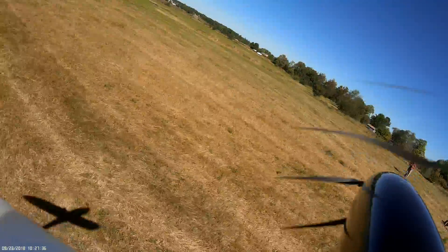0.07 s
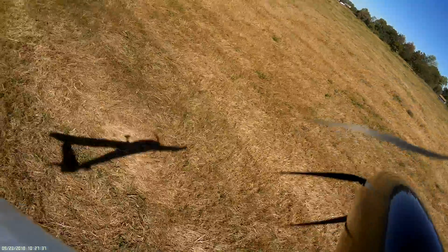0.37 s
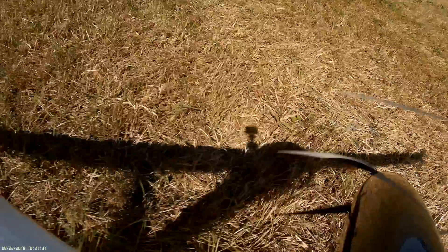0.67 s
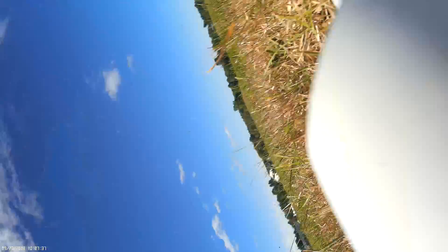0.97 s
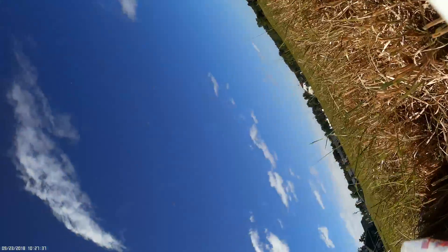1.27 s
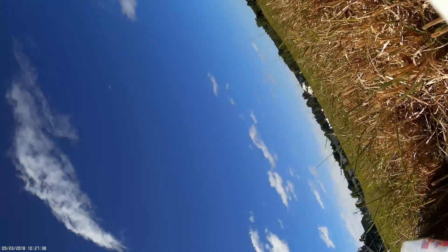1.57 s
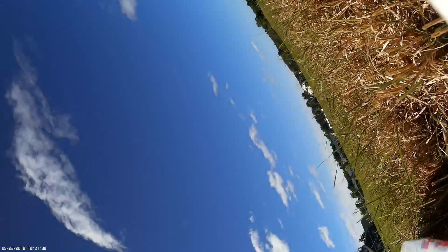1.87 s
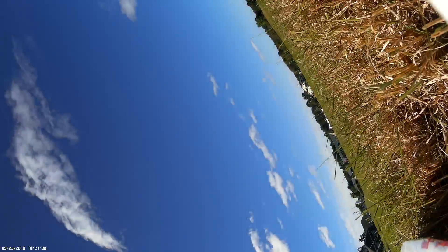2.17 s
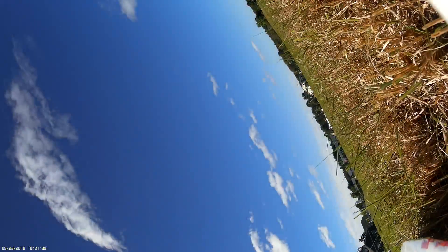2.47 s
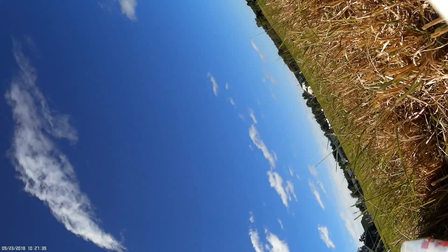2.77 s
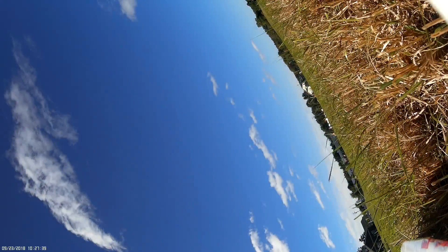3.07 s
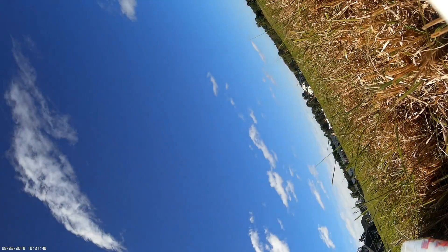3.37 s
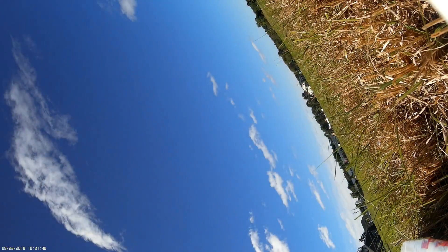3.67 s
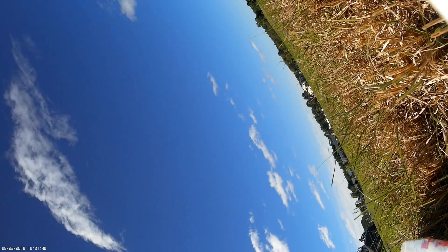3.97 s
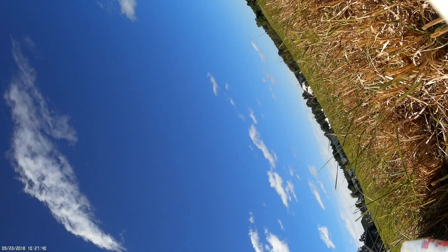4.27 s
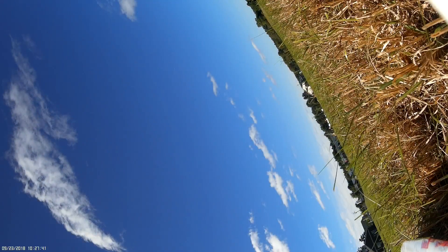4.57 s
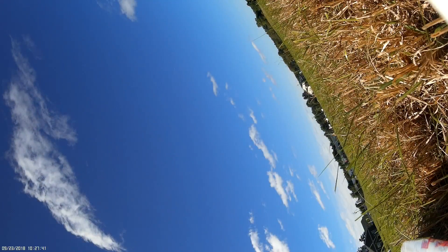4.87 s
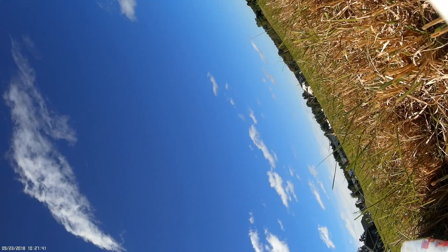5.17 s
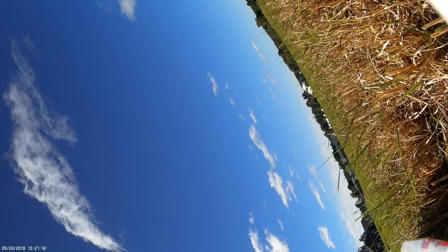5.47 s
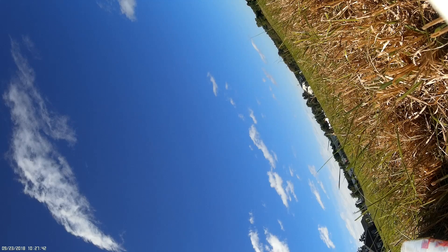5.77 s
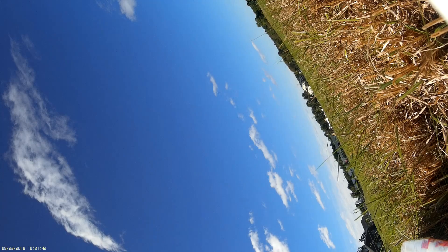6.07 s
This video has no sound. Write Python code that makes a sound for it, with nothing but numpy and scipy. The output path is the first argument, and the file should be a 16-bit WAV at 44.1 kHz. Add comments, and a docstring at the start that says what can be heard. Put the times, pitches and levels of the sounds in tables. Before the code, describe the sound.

The microphone rides on a model glider diving toward a dry grass field. From the start, air rushes past and the windmilling propeller makes a fast, low throb, strongest from 0.2 to 0.5 seconds and slowing slightly. A faint, thin whistle comes just before touchdown.

At about 0.75 seconds the hull hits and ploughs through crackling stalks, with loud cracks that overload the microphone around 0.8 seconds. The glider tumbles with thumps, scrapes and bits of gear whirr, gives a last sharp knock near 1.2 seconds and settles.

A stalled servo buzzes softly from 1.3 to 1.7 seconds, then breaks into a louder, rattling whirr from 1.85 to 2 seconds. Small, scattered servo ticks follow until about 4.2 seconds. Quiet, low gusts on the microphone, a slight hiss and a very faint, high bush cricket continue to the end at about 6 seconds.

```python
"""A dry grass field, heard from on board a model glider that dives, propeller windmilling, and crashes.
Blade wakes throb in the rushing air; then the hull ploughs through the stalks, overloading the
microphone, cartwheels and knocks to rest on its side. A loaded servo buzzes, whirrs once and
goes on twitching; a breeze and a faint bush cricket remain."""
import sys
import numpy as np
from scipy import signal
from scipy.fft import rfft, irfft
from scipy.io import wavfile

SR = 44100
rng = np.random.default_rng(int(sys.argv[2]) if len(sys.argv) > 2 else 0)


def generate_wav(signal):
    """Clip the signal to [-1, 1] and save it as 16-bit WAV at the path in sys.argv[1]."""
    frames = np.transpose(np.atleast_2d(signal))
    scaled = np.clip(frames, -1, 1) * 32767
    pcm = np.round(scaled).astype(np.int16)
    wavfile.write(sys.argv[1], SR, pcm)


N = 269892
TIME = np.arange(N) / SR
# airframe resonances: (frequency [Hz], width [Hz], level [dB])
AIRFRAME = [(340, 70, -5), (600, 130, -2.5), (814, 130, -3), (1087, 79, 0.5), (1436, 180, -1),
            (1800, 140, 0.5), (2015, 160, -1), (2597, 400, -1.5), (3232, 210, -2), (4220, 530, -5.5),
            (5860, 1600, -15.5), (7300, 1200, -5.5), (10000, 900, -7), (12000, 1600, -9)]
# rumble of swirling air and of the hull on soil: (frequency [Hz], level [dB])
RUMBLE = [(20, -9.5), (60, 0.5), (130, 0.5), (250, -2), (500, -3), (1000, -10.5), (2000, -21.5),
          (4000, -39), (12000, -53.5)]


def from_db(db):
    """Decibels to gain."""
    return 10 ** (np.asarray(db) / 20)


def rms_one(x):
    """Scale to unit power."""
    return x / np.sqrt(np.mean(x ** 2) + 1e-20)


def butter(x, order, hz, kind="low"):
    """Butterworth filter, low-pass by default."""
    return signal.sosfilt(signal.butter(order, hz, kind, fs=SR, output="sos"), x)


def colour(x, spectrum):
    """Shape x with an EQ curve of (frequency [Hz], level [dB]) points; unit power."""
    hz, db = np.transpose(spectrum)
    bins = np.maximum(np.fft.rfftfreq(N, 1 / SR), 1)
    gain = from_db(np.interp(np.log(bins), np.log(hz), db)) * (bins > 10)
    return rms_one(irfft(rfft(x) * gain, N))


def noise(spectrum):
    """Smooth noise with a given spectrum."""
    return colour(rng.standard_normal(N), spectrum)


def drift(rate_hz):
    """Random wander, rolling off above rate_hz; unit power."""
    bins = np.fft.rfftfreq(N, 1 / SR)
    return rms_one(irfft(rfft(rng.standard_normal(N)) * np.exp(-(bins / rate_hz) ** 2), N))


def grains(per_s, spread_db):
    """Random clicks of very uneven size."""
    sizes = from_db(spread_db * np.minimum(rng.exponential(1, N), 4)) * rng.choice([-1, 1], N)
    return sizes * (rng.random(N) < per_s / SR)


def envelope(from_s, to_s, rise, fall, sag=0):
    """Rise to gain 1 at from_s, sag until to_s, then fall; slopes in dB/s."""
    before, after = np.maximum(from_s - TIME, 0), np.maximum(TIME - to_s, 0)
    held = np.maximum(np.minimum(TIME, to_s) - from_s, 0)
    return from_db(-np.minimum(rise * before + sag * held + fall * after, 200))


def add(track, s, sound):
    """Mix a short sound into the track at time s."""
    start = int(s * SR)
    track[start:start + len(sound)] += sound[:N - start]


def strike(modes, crush_s, bright_hz, click, rise_s=.0001, direct=.088):
    """A clean click plus a short gritty force rings a set of resonances; peak 1."""
    t = TIME[:SR // 10]
    force = rng.standard_normal(len(t)) * np.exp(-t / crush_s) * (1 - np.exp(-t / rise_s))
    force[int(rise_s * SR)] += click * np.linalg.norm(force)
    force = butter(force, 1, bright_hz)
    out = direct * force
    for k, (hz, width, db) in enumerate(modes):
        r = np.exp(-np.pi * width / SR)
        gain = (-1) ** k * from_db(db) * (1 - r * r) / 2
        out += signal.lfilter([gain, 0, -gain], [1, -2 * r * np.cos(2 * np.pi * hz / SR), r * r], force)
    return out / np.abs(out).max()


def air_rush(turns, chop=.23, fade_db_per_s=27, settle_s=.025):
    """The blades chop an airstream that fades as speed is lost and buffets the nose in spells."""
    # smooth and ragged airflow: (frequency [Hz], level [dB])
    smooth = [(200, -8.5), (1000, -0.5), (2000, 4.5), (3000, -5.5), (4300, -9), (5500, -16.5),
              (6800, -14.5), (7600, -4.5), (8400, -15.5), (9400, -8.5), (10400, -15.5), (11800, -8.5),
              (13400, -19), (15000, -18.5), (16000, -25.5)]
    ragged = [(15, -44), (25, -12.5), (70, -3.5), (97, -10), (130, 0), (166, -12), (200, 0), (439, -12),
              (734, -9), (1070, -16.5), (1330, -11.5), (11900, -43), (16000, -51)]
    # spells of turbulence: (start [s], end [s], level [dB])
    buffets = [(.015, 0.121, -10.5), (0.597, 0.718, -21.5)]
    rush = from_db(-25.5 - fade_db_per_s * TIME) * noise(smooth)
    spells = [from_db(db) / (1 + np.abs(TIME - np.clip(TIME, start, end)) / settle_s)
              for start, end, db in buffets]
    chopped = 1 + chop * np.cos(4 * np.pi * turns)
    return chopped * (rush + np.max(spells, axis=0) * noise(ragged))


def blade_wakes(turns, flying, touchdown_s, wake_s=.00075, jitter_s=.00046):
    """Two unequal blades sweep their wakes over the microphone, squarely in mid-dive."""
    uneven_db, second_blade_db = 1.9, -5.5
    passes = np.flatnonzero(np.diff(np.floor(2 * turns)) * flying[1:])
    t = np.arange(-SR // 100, SR // 100) / SR
    wakes = np.zeros(N)
    for k, at in enumerate(passes):
        size, late, wide = rng.standard_normal(3)
        u = (t - jitter_s * late) / (wake_s * np.exp(.13 * wide))
        gain = from_db(uneven_db * size + second_blade_db * (k % 2))
        add(wakes, at / SR, -u * np.exp(-np.abs(u)) * gain)  # a push, then a suction
    pressure_tail = butter(wakes, 1, 170)
    nose_boom = butter(wakes, 1, [200, 450], "band")
    wakes += pressure_tail / 2 + .93 * nose_boom
    wakes /= np.std(wakes[TIME < touchdown_s])
    swirl = from_db(-11) * noise(RUMBLE)
    return from_db(-8.5) * envelope(.155, .47, rise=208, fall=56, sag=5.5) * (wakes + swirl)


def dive(touchdown_s=.76, stopped_s=.8):
    """The windmilling propeller slows as the glider flattens out; touchdown ends wakes and rush."""
    # propeller speed: (time [s], rate [turns/s])
    speed = [(0, 69), (0.12, 65.5), (0.22, 64.5), (0.48, 64), (0.64, 59.5), (0.76, 57)]
    turns = np.cumsum(np.interp(TIME, *np.transpose(speed))) / SR
    flying = np.interp(TIME, [touchdown_s, stopped_s], [1, 0])
    return flying * (blade_wakes(turns, flying, touchdown_s) + air_rush(turns))


def servo_gears(first_kick_s, kick_hz, surge=.4):
    """Gear teeth whirr: smooth and dull in the pull-up, surging at the kick rate on the ground."""
    # meshing teeth: (frequency [Hz], level [dB])
    whirr = [(200, -29.5), (340, -14), (450, -17.5), (850, -5), (1400, -10), (2000, 4.5), (2650, -5),
             (3350, -1.5), (5100, -15.5), (5800, -11), (6800, -21), (7500, -16.5), (8300, -19), (9300, -20),
             (10700, -22), (11900, -19.5), (15500, -44)]
    # runs on the ground: (start [s], end [s], level [dB], sag [dB/s], release [dB/s])
    runs = [(0.863, 1.095, -35, -14, 400), (1.221, 1.235, -39, 10, 176), (1.748, 1.776, -60.5, 12, 300),
            (1.853, 2.026, -25, 86, 797)]
    teeth = colour(grains(per_s=4100, spread_db=4.5), whirr)
    pull_up = from_db(-29.5) * envelope(.55, .58, rise=550, fall=550) * butter(teeth, 1, 4500)
    running = sum(from_db(db) * envelope(start, end, rise=349.5, fall=fall, sag=sag)
                  for start, end, db, sag, fall in runs)
    torque = 1 + surge * np.cos(2 * np.pi * kick_hz * (TIME - first_kick_s))
    return pull_up + running * torque * teeth


def whistle(hz=9216, wander_hz=40, at_s=.74, half_length_s=.036):
    """A thin whistle swells and fades just before touchdown."""
    phase = 2 * np.pi * np.cumsum(hz + wander_hz * drift(80)) / SR
    return from_db(-45) * np.exp(-((TIME - at_s) / half_length_s) ** 2) * np.sin(phase)


def stubble():
    """Dry stalks snap in a dense crackle while the hull rumbles over the soil."""
    # snapping straw: (frequency [Hz], level [dB])
    straw = [(200, -5.5), (800, 2.5), (2000, 5), (3300, -1), (5200, -8), (7500, -4.5), (8400, -8),
             (9500, -6), (10600, -12.5), (12000, -4.5), (14800, -12.5), (16500, -26.5)]
    # stalk brushes and hull drags: (start [s], end [s], level [dB], release [dB/s])
    brushes = [(0.781, 0.835, -9, 950), (0.939, 0.974, -21, 220), (1.108, 1.121, -26, 699.5),
               (1.13, 1.2, -33.5, 169)]
    drags = [(0.721, .77, -14, 200), (0.782, 0.812, -7, 380), (0.9, 1.065, -27.5, 301),
             (1.188, 1.21, -40, 167)]
    crackle = colour(grains(per_s=8200, spread_db=2), straw) * from_db(1.6 * drift(83))
    brushing = [from_db(db) * envelope(start, end, rise=1000, fall=fall)
                for start, end, db, fall in brushes]
    dragging = [from_db(db) * envelope(start, end, rise=700, fall=fall)
                for start, end, db, fall in drags]
    return np.max(brushing, axis=0) * crackle + np.max(dragging, axis=0) * noise(RUMBLE)


def blows(snap_s=.0015, detune=.06):
    """Each blow cracks in the shell and sets the wing and fuselage bending with a thump."""
    # impacts: (time [s], level [dB], crush time [s], brightness [Hz], thump send [dB])
    impacts = [(.7618, -9.5, 0.0024, 3000, -12), (0.7749, -5.5, 0.0013, 9000, -4),
               (0.7933, 8, 0.003, 7100, -35), (0.8014, 10, 0.0023, 7000, -39),
               (0.8209, 7, 0.008, 9000, -16), (0.8276, 17, 0.003, 6040, -23),
               (.837, 5.5, 0.0085, 3030, -12.5), (.848, 3, 0.0064, 4000, -37),
               (0.886, -13.5, .005, 2460, -23.5), (0.9, -20, .0034, 3980, -22),
               (.9655, -8.5, 0.0071, 1500, 4.5), (1.0052, -6.5, 0.0021, 2750, -17),
               (1.0587, 0.5, 0.0011, 2800, -25), (1.1727, 6.5, 0.0013, 8000, -13),
               (1.1764, -6, 0.0033, 1300, -7), (1.1878, -11.5, 0.0028, 3990, -12.5),
               (1.2218, -25, 0.0068, 2004, -21), (1.2593, -24.5, 0.014, 1190, -29),
               (1.657, -47, .008, 500, -15.5)]
    # bending modes: (frequency [Hz], level [dB], time to fall 60 dB [s])
    bending = [(108, 0.5, 0.049), (198, 0.5, .04), (304, -6.5, .035), (478.8, -4, .035)]
    out, t = np.zeros(N), TIME[:SR // 5]
    for s, level_db, crush_s, bright_hz, thump_db in impacts:
        thump = np.zeros(len(t))
        for k, (hz, db, t60) in enumerate(bending):
            pitch = hz * (1 + detune * rng.standard_normal())
            thump += (-1) ** k * from_db(db - 60 * t / t60) * np.sin(2 * np.pi * pitch * t)
        click = 1.92 * np.exp(-crush_s / snap_s)  # brief blows snap, long ones crunch
        add(out, s, from_db(level_db) * strike(AIRFRAME, crush_s, bright_hz, click))
        add(out, s, from_db(level_db + thump_db) * thump / 2)
    return out


def servo_motor(first_kick_s, kick_hz, give_up_s=1.69, free_s=1.77, last_kick_s=2.03):
    """Control pulses kick the motor: it buzzes stalled, rattles free, then only twitches."""
    # resonances of the servo on its tray: (frequency [Hz], width [Hz], level [dB])
    tray = [(334, 70, -12.5), (603, 68, -1.5), (803, 94, -1.5), (1270, 180, -1.5), (1590, 140, -3),
            (1786, 140, 2), (2130, 100, 4.5), (2560, 390, -4), (3090, 290, -7), (4250, 270, -1.5)]
    # teeth catching and snapping past each other: (time [s], level [dB])
    snaps = [(1.780, -32), (1.853, -13), (1.87, -12), (1.966, -14.5), (1.982, -22)]
    # single jerks: (time [s], level [dB], brightness [Hz])
    twitches = [(2.056, -37.5, 4000), (2.111, -45.5, 2400), (2.335, -51, 2000), (2.905, -39.5, 2390),
                (2.923, -46, 2400), (3.549, -48.5, 2400), (3.713, -49, 1500), (3.769, -48.5, 1500),
                (3.806, -50, 1497), (3.987, -39.5, 4500), (4.007, -50, 2400), (4.154, -48.5, 2000)]
    held, moving = np.zeros(N), np.zeros(N)
    effort = envelope(1.86, 1.98, rise=230, fall=150, sag=20)
    for s in np.arange(first_kick_s, last_kick_s, 1 / kick_hz):
        if s < free_s:  # stalled, the kicks are much alike: a soft pitched buzz
            gain = from_db(-46.5 - 300 * max(s - give_up_s, 0))
            kick = strike(tray, crush_s=.00214, bright_hz=1300, click=1.8, rise_s=.001203)
            add(held, s, gain * kick)
        else:  # turning, the gears clash anew each time and shake the airframe
            gain = effort[int(s * SR)] * from_db(-18 + 2 * rng.standard_normal())
            clash = strike(AIRFRAME, crush_s=.0041, bright_hz=4500, click=.39, rise_s=.00058)
            add(moving, s, gain * clash)
    for s, db in snaps:
        snap = strike(AIRFRAME, crush_s=.0019, bright_hz=5500, click=.3, rise_s=.00077)
        add(moving, s, from_db(db) * snap)
    for s, db, bright_hz in twitches:
        twitch = strike(tray, crush_s=.0058, bright_hz=bright_hz, click=.86, rise_s=.0007)
        add(held, s, from_db(db) * twitch)
    through_mount = butter(held, 3, 5200)
    return through_mount + butter(moving, 1, [1900, 5500], "band")


def breeze(calm_db=-64, eddy_s=.0017):
    """Gusts swell out of a light breeze: lumpy wind on the microphone port over a steady hiss."""
    # wind rumble and background hiss: (frequency [Hz], level [dB])
    wind_spectrum = [(15, -4), (30, 1.5), (55, -1), (100, -10.5), (150, -16), (250, -29.5), (500, -37.5),
                     (1500, -41), (8000, -55)]
    hiss = [(59, -29.5), (100, -1), (220, -9), (456, -14), (1350, -20.5), (13900, -22.5), (15100, -26.5),
            (16500, -36.5)]
    # gusts: (time [s], level [dB], half length [s])
    gusts = [(1.403, -49, 0.044), (1.954, -53, .12), (2.68, -52.5, .13), (2.969, -54.5, .08),
             (3.463, -53, 0.17), (4.758, -51, 0.22), (5.32, -50, 0.03), (5.8, -53, .13)]
    # eddies bumping the microphone: (time [s], peak [dB])
    eddies = [(1.398, -43), (3.478, -42.5), (4.558, -45), (4.722, -41.5), (5.331, -56), (5.782, -47)]
    gust_power = sum(from_db(db) ** 2 * np.exp(-((TIME - s) / half_s) ** 2) for s, db, half_s in gusts)
    lumpy = rms_one(noise(wind_spectrum) * from_db(2 * drift(20.6)))
    wind = np.sqrt(from_db(calm_db) ** 2 + gust_power) * lumpy
    for s, peak_db in eddies:  # a push, then a suction
        u = (TIME - s) / eddy_s
        wind -= from_db(peak_db) * u * np.exp(1 - np.minimum(np.abs(u), 50))
    return wind + from_db(-66) * noise(hiss)


def cricket(hz=8890, chirps_per_s=19.6, swell_db=4, swell_at_s=4.8):
    """A far bush cricket ticks away on one high note, louder for a moment."""
    chirps = np.maximum(np.cos(2 * np.pi * chirps_per_s * TIME), 0) ** 2
    db = -76 + 1.5 * drift(2) + swell_db * np.exp(-((TIME - swell_at_s) / .3) ** 2)
    phase = 2 * np.pi * np.cumsum(hz + 40 * drift(150)) / SR
    return from_db(db) * chirps * np.sin(phase)


def scene():
    """Everything reaches the one microphone on the fuselage."""
    first_kick_s, kick_hz = 1.305, 54.55
    crash = dive() + whistle() + stubble() + blows()
    servo = servo_motor(first_kick_s, kick_hz) + servo_gears(first_kick_s, kick_hz)
    return (crash + servo + cricket() + breeze())[None]


def record(dry):
    """The microphone loses the highest treble, its input overloads hard, and the top is cut."""
    clipped = np.clip(butter(dry, 8, 15400), -1, 1)
    return signal.sosfilt(signal.ellip(10, .1, 80, 16900, fs=SR, output="sos"), clipped)


dry = scene()
out = record(dry)
generate_wav(out)
```